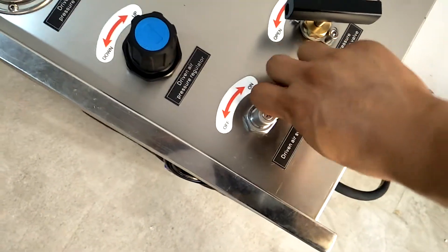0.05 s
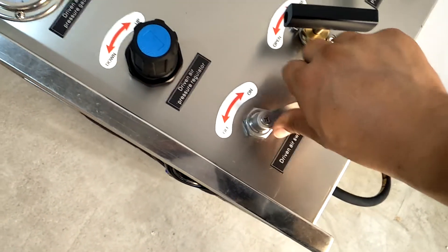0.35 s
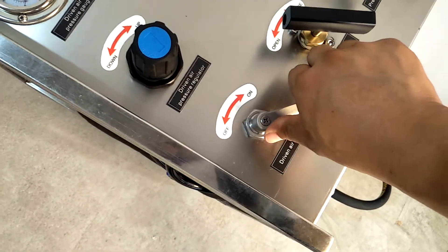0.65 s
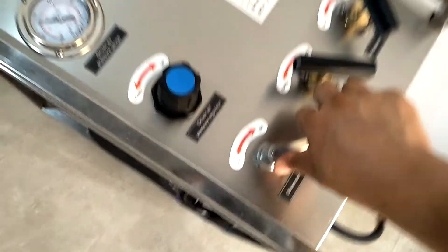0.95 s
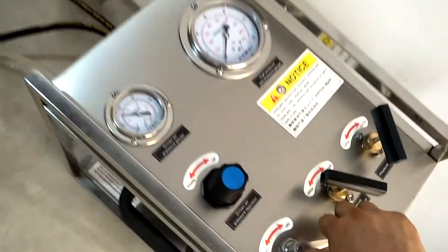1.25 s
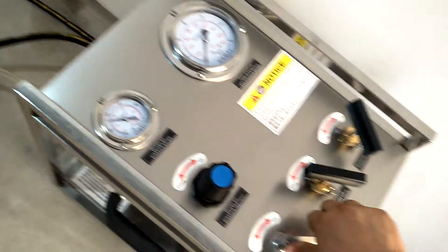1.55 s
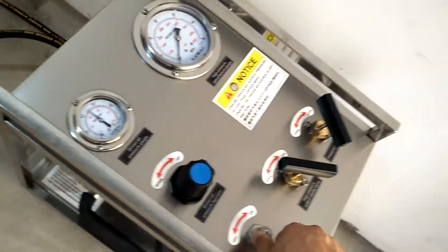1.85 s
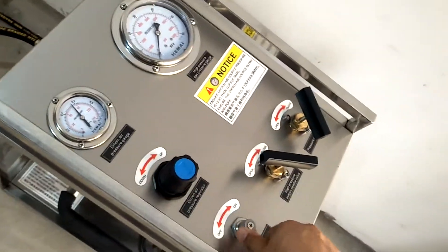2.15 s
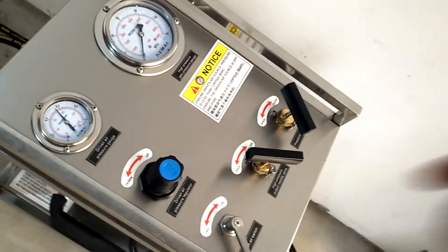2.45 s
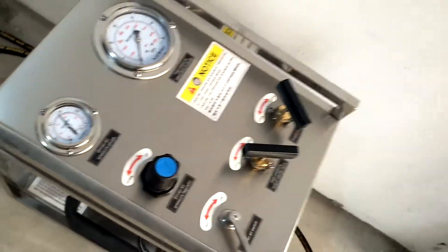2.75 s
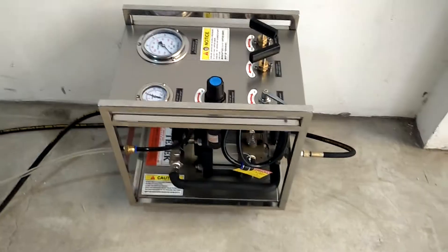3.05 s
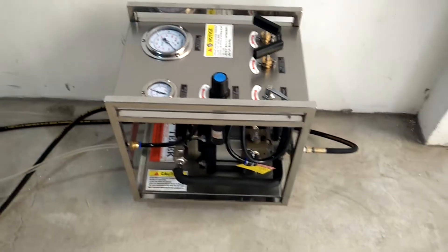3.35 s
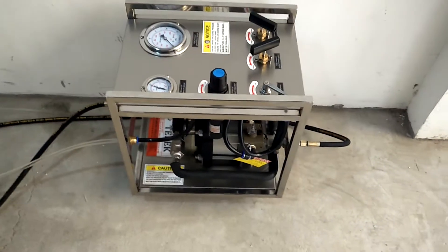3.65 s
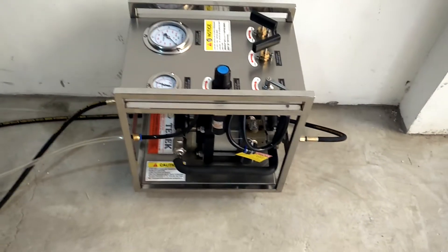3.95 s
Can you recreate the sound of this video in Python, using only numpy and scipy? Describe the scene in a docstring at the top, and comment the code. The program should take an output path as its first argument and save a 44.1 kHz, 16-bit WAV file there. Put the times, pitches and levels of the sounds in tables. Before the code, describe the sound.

An air-driven pump hisses loudly while its piston thuds and clacks evenly, ringing a steel frame. The strokes give way to a fast hammering drone with leaking air, which cuts off abruptly, leaving faint rustles in a quiet workshop.

```python
"""Air-driven booster pump

Exhaust air hisses as turbulent noise while a piston thuds to and fro, each impact exciting the modes
of a steel frame. After two seconds the strokes give way to a fast hammering drone, the harmonic series
of a periodic knock, with churning and leaking air. The sound cuts off abruptly, leaving faint rustles
and ticks in the quiet workshop."""
import sys
import numpy as np
from scipy import signal
from scipy.fft import rfft, irfft
from scipy.io import wavfile

SR = 44100
rng = np.random.default_rng(int(sys.argv[2]) if len(sys.argv) > 2 else 0)


def master_out(mix):
    """Clip the mix to full scale and print it as 16-bit PCM to the path in sys.argv[1]."""
    frames = np.transpose(np.atleast_2d(mix))
    ceiling = np.clip(frames, -1, 1)
    pcm = np.round(ceiling * 32767).astype(np.int16)
    wavfile.write(sys.argv[1], SR, pcm)


N = 176400
T = np.arange(N) / SR
FREQS = np.maximum(np.arange(N // 2 + 1) * SR / N, 1)
PUMP_PAN_DB, RUSTLE_PAN_DB = 2.5, -2
DRONE_HZ = 46.2


def from_db(db):
    """Amplitude ratio: a factor of ten for every 20 dB."""
    return 10 ** (np.asarray(db) / 20)


def unit_rms(x):
    """Normalisation to unit mean power."""
    return x / np.sqrt(np.mean(x ** 2) + 1e-20)


def envelope(rows):
    """Amplitude envelope, linear in decibels between (time_s, level_db) points."""
    return from_db(np.interp(T, *np.transpose(rows)))


def spectrum(points):
    """Spectral curve, interpolated on a logarithmic frequency axis."""
    hz, values = np.transpose(points)
    return np.interp(np.log(FREQS), np.log(hz), values)


def pan(db):
    """Interchannel level difference: positive values favour the left."""
    return from_db(np.array([[db], [-db]]) / 2)


def drift(rate_hz):
    """Slow random fluctuation: low-passed noise of unit rms."""
    return unit_rms(irfft(rfft(rng.standard_normal(N)) / (1 + (FREQS / rate_hz) ** 2), N))


def burst(start_s, rise_s, t60_s):
    """Transient envelope: a linear rise, then exponential decay by 60 dB in t60_s."""
    rise = np.clip((T - start_s) / rise_s, 0, 1)
    return rise * from_db(-60 * np.maximum(T - start_s - rise_s, 0) / t60_s)


def pressure_pulse(crest_s, hz, width_cycles):
    """A Gaussian-windowed cosine makes one abrupt pressure swing: dip, crest, dip."""
    cycles = np.clip(hz * (T - crest_s), -.75, .75)
    return np.cos(2 * np.pi * cycles) * np.exp(-(cycles / width_cycles) ** 2)


def treble_shelf(x, rows, split_hz=8000):
    """Time-varying shelf filter: the treble follows its own envelope."""
    treble = irfft(rfft(x) / (1 + (split_hz / FREQS) ** 12), N)
    return x + treble * (envelope(rows) - 1)


# Likeness of the sound field at left and right: frequency_hz, coherence
COHERENCE = [(60, .98), (150, 0.95), (380, 0.97), (950, 0.3), (2380, 0), (15000, 0.0042)]

def noise(colour, echo_db=-5.5):
    """Partly coherent stereo noise of unit rms, comb-filtered by close reflections off the panels."""
    mid, side = rfft(rng.standard_normal((2, N)))
    coherence = np.clip(spectrum(COHERENCE), -1, 1)
    echoes = np.zeros((2, N))
    for channel in echoes:
        signs = rng.choice([-1, 1], size=6)
        delays = rng.integers(SR // 1000, SR // 100, size=6)
        channel[delays] = from_db(echo_db) * signs
    direct = np.sqrt(1 + coherence) * mid + np.sqrt(1 - coherence) * side * [[1], [-1]]
    comb = 1 + (1 - coherence) * rfft(echoes)
    return unit_rms(irfft(direct * comb * from_db(spectrum(colour)), N))


# Exhaust flow, and the extra gain of its treble: time_s, level_db
EXHAUST_FLOW = [(0, -16), (.04, -16.5), (.08, -12.5), (.5, -14), (1.0, -15), (1.3, -16.5), (1.56, -16.5),
                (1.62, -18), (1.69, -23.5), (1.73, -13.5), (1.86, -12), (1.93, -20.5), (2.02, -22.5),
                (2.2, -37), (3.05, -48.5)]
EXHAUST_TREBLE = [(0, -0.5), (1.55, 1.5), (1.63, -6.5), (1.69, 1), (1.73, -3), (1.9, 1), (2.05, 0.5)]
# Spectra of the hiss and the rumble: frequency_hz, level_db
HISS_SPECTRUM = [(120, -46.5), (200, -17.5), (390, -13), (540, -29.5), (820, -2.5), (1280, -12),
                 (2060, -10), (2330, -3), (2750, -8.5), (3700, -5.5), (4150, -10), (5000, -1.5),
                 (6000, 2.5), (7250, -0.5), (8300, -8.5), (11400, -10.5), (12300, -4.5), (12800, -6),
                 (13150, -11.5), (14400, -4.5), (15600, -14)]
RUMBLE_SPECTRUM = [(25, -20), (50, -20.5), (85, 4), (130, -8), (220, -21), (500, -39.5)]

def exhaust():
    """Turbulence: drive air leaves the muffler as a broadband hiss over a low rumble."""
    flow = envelope(EXHAUST_FLOW) * from_db(.5 * drift(rate_hz=36))
    hiss = pan(2) * treble_shelf(noise(HISS_SPECTRUM), EXHAUST_TREBLE)
    rumble = from_db(-14.5) * noise(RUMBLE_SPECTRUM)
    return flow * (hiss + rumble)


# Modes of the steel frame: pitch_hz, level_db, t60_s
FRAME_MODES = [(67.3, -0.5, 0.9), (82.9, -0.5, 0.75), (103, -3.5, 0.22), (139, 3, 0.41),
               (153.8, -0.5, 0.25), (201, -0.5, 0.25), (234, -5, 0.43), (335, -3, 0.32), (394, 4.5, 0.31),
               (438.5, -2.5, 0.3), (790, -0.5, 0.098), (824, -1, .2), (1520, -2, 0.2)]

def frame_ring():
    """Modal resonance: each stroke excites every damped mode with a slightly different strength."""
    blows = [(0.0014, -4.5)]   # the frame is already ringing at the start
    blows += [(s + .005, db) for s, db in POWER_STROKES]
    blows += [(s, db - 8) for s, db in RETURN_STROKES]
    start_s, blow_db = np.transpose(blows)
    ring = np.zeros((2, N))
    for hz, mode_db, t60_s in FRAME_MODES:
        spread_db = rng.normal(0, 1.2, len(blows)) + rng.normal(0, 1, (2, 1))
        impulses = np.zeros((2, N))
        impulses[:, (start_s * SR).astype(int)] = from_db(blow_db + mode_db + spread_db)
        radius, angle = from_db(-60 / (t60_s * SR)), 2 * np.pi * hz / SR
        feedback = [1, -2 * radius * np.cos(angle), radius ** 2]
        ring += signal.lfilter([0, np.sin(angle)], feedback, impulses + 1e-18)
    return from_db(-25.5) * ring


# Return strokes of the piston: time_s, level_db
RETURN_STROKES = [(.106, -0.5), (0.459, -0.5), (.819, 1), (1.182, -2), (1.548, -1.5)]
# Spectrum of the air valve's clack: frequency_hz, level_db
CLACK_SPECTRUM = [(200, -5.5), (400, -5.5), (570, -14), (850, 6), (1150, -5.5), (1600, -4), (2600, -4.5),
                  (5000, -13), (15000, -29)]

def return_strokes(rebound_s=0.038, valve_delay_s=.024):
    """Impact and rebound: a soft double knock, with the clack of the air valve."""
    knocks = sum(from_db(db - 15.5) * pressure_pulse(s + delay_s, hz=67, width_cycles=.45)
                 for s, db in RETURN_STROKES for delay_s in (0, rebound_s))
    clacks = sum(from_db(db - 16.5) * burst(s + valve_delay_s, rise_s=0.0032, t60_s=0.18)
                 for s, db in RETURN_STROKES)
    return clacks * noise(CLACK_SPECTRUM) - knocks


# Power strokes of the piston: time_s, level_db
POWER_STROKES = [(0.2993, 0.5), (.660, 0), (1.024, 0), (1.391, -0.5), (1.756, 0)]
# Spectra of the spit of air, the hard contact and the rattle: frequency_hz, level_db
SPIT_SPECTRUM = [(2000, -31), (4500, 1), (8000, -2.5), (11000, 1.5), (16000, 0.5)]
CRACK_SPECTRUM = [(200, -21), (400, 0), (600, -8), (840, 4.5), (1050, -5.5), (1400, -34.5), (4000, -48)]
RATTLE_SPECTRUM = [(60, -1), (200, -15), (400, 2), (600, -12.5), (850, -3), (1200, -11), (1500, -7.5),
                   (3000, -11), (5000, -4), (9000, -33)]

def power_strokes():
    """Impact noise: air spits, then hard contact radiates a thud and a crack, and a rattle decays."""
    def bursts(lead_s, rise_s, t60_s):
        return sum(from_db(db) * burst(s - lead_s, rise_s, t60_s) for s, db in POWER_STROKES)
    thuds = sum(from_db(db - 8.5) * pressure_pulse(s, hz=146, width_cycles=1) for s, db in POWER_STROKES)
    spit = from_db(-11) * bursts(lead_s=0.017, rise_s=0.0018, t60_s=0.32) * noise(SPIT_SPECTRUM)
    crack = from_db(-18.5) * bursts(lead_s=0.0057, rise_s=0.00067, t60_s=0.11) * noise(CRACK_SPECTRUM)
    rattle = from_db(-18) * bursts(lead_s=0, rise_s=.01, t60_s=0.4) * noise(RATTLE_SPECTRUM)
    return thuds + spit + crack + rattle


def puffing(depth=0.13):
    """Amplitude modulation: the air pulses at the drone's fundamental."""
    return 1 + depth * np.cos(2 * np.pi * DRONE_HZ * T)


# Flow of the churning air: time_s, level_db
CHURN_FLOW = [(1.75, -31.5), (1.95, -27.5), (2.0, -32), (2.06, -20.5), (2.2, -24.5), (3.05, -25)]
# Its spectrum: frequency_hz, level_db
CHURN_SPECTRUM = [(30, -10.5), (100, -7.5), (280, -9.5), (450, 4), (700, 3), (1000, -8), (1350, -0.5),
                  (1650, -8), (2050, -2.5), (2450, -1), (2800, -10), (4000, -13.5), (9000, -42)]

def churn():
    """Pulsating turbulence: midrange air noise, faint at first, swells under the drone."""
    return puffing() * envelope(CHURN_FLOW) * noise(CHURN_SPECTRUM)


# Knocks within one cycle of the drone: cycle_fraction, relative_strength
CYCLE_KNOCKS = [(.23, 1), (.535, .88)]
# Harmonic series of the drone: harmonic_number, level_db
DRONE_HARMONICS = [(1, -21), (2, -7), (3, -20), (4, 0), (5, -19), (6, -26.5), (7, -3.5), (8, -12),
                   (9, -16.5), (10, -9), (11, -4), (12, -7.5), (13, -6.5), (14, -0.5), (15, -19), (16, -6),
                   (17, -9), (18, -11), (19, -13.5), (20, -20), (21, -16), (22, -18), (23, -23),
                   (24, -15.5), (25, -13.5), (26, -14), (27, -2), (28, -13), (29, -10), (30, -13.5),
                   (31, -25), (32, -8), (33, -17.5), (34, -21.5), (35, -20), (36, -28.5), (37, -18),
                   (38, -22), (39, -11.5), (40, -23), (41, -8), (42, -18), (43, -12), (44, -7), (45, -17),
                   (46, -18)]
# Envelope of the drone, and the extra gain of its upper harmonics: time_s, level_db
DRONE_LEVEL = [(1.9, -61.5), (2.0, -22.5), (2.06, -18), (2.15, -15.5), (2.28, -14.5), (2.7, -14.5),
               (3.05, -15)]
DRONE_TREBLE = [(2.05, -1.8), (2.3, -1.6), (2.65, 0), (3.05, 0.63)]

def drone(catch_s=2.03, settle_s=0.057, smear_hz=1260, wide_hz=518, treble_hz=1600):
    """Fourier series: two knocks a cycle set the phases, which the frame scatters in the treble."""
    jitter_s = .00003 + 0.00078 * np.exp(-np.maximum(T - catch_s, 0) / settle_s)   # the rhythm steadies
    cycles = DRONE_HZ * (T + jitter_s * drift(rate_hz=29))
    fraction, strength = np.transpose(CYCLE_KNOCKS)
    treble = envelope(DRONE_TREBLE)
    delay_s_per_hz = 4.5e-6   # dispersion: each knock's treble arrives later
    hammering = np.zeros((2, N))
    for harmonic, db in DRONE_HARMONICS:
        hz = harmonic * DRONE_HZ
        knock_phase = np.angle(-np.sum(strength * np.exp(-2j * np.pi * harmonic * fraction)))
        scatter = rng.standard_normal() * (.12 + (hz / smear_hz) ** 2)
        phase = knock_phase - np.pi * delay_s_per_hz * hz ** 2 + scatter
        partial = np.exp(1j * (2 * np.pi * harmonic * cycles + phase))
        width = 1.27 * hz ** 2 / (hz ** 2 + wide_hz ** 2)   # left and right differ above wide_hz
        side_angle = rng.choice([-1, 1]) * np.pi / 2 + rng.normal(0, 0.74)
        side = width * np.exp(1j * side_angle) * np.array([[1], [-1]])
        gain = from_db(db) * (treble if hz > treble_hz else 1)
        hammering += gain * np.real((1 + side) * partial)
    return pan(PUMP_PAN_DB) * envelope(DRONE_LEVEL) * unit_rms(hammering)


# Flow of the leak, and the extra gain of its treble: time_s, level_db
LEAK_FLOW = [(1.99, -40.5), (2.012, -23), (2.24, -21.5), (2.39, -16), (2.46, -19.5), (2.56, -19.5),
             (2.61, -24), (2.68, -24), (2.71, -18.5), (2.77, -21), (2.83, -17.5), (2.92, -20), (3.0, -25.5),
             (3.05, -24)]
LEAK_TREBLE = [(2.0, 1.5), (2.4, -10.5), (2.55, -2), (2.608, 7), (2.67, 0.5), (2.71, 11), (2.9, 8),
               (3.05, 6)]
# Its spectrum: frequency_hz, level_db
LEAK_SPECTRUM = [(2000, -18), (2900, -14.5), (3700, -5.5), (4450, 1), (4950, -6.5), (5400, 0), (6300, 2),
                 (7200, -10), (8500, -15.5), (10500, -32), (15000, -40.5)]

def leak():
    """Jet noise: leaking air hisses brightly, puffing in time with the drone."""
    hiss = treble_shelf(noise(LEAK_SPECTRUM), LEAK_TREBLE)
    return pan(3) * puffing() * envelope(LEAK_FLOW) * hiss


# Spectrum of the squeal: frequency_hz, level_db
SQUEAL_SPECTRUM = [(1000, -45), (1260, -14.5), (1345, 2), (1430, -15), (1800, -41)]

def squeal():
    """Narrowband noise is heard as a pitch: air squeals briefly as the drone catches."""
    return from_db(-23.5) * burst(2.025, rise_s=.03, t60_s=.45) * noise(SQUEAL_SPECTRUM)


# Faint rubs: start_s, rise_s, t60_s, level_db, relative_ring_db
RUBS = [(3.365, 0.021, .17, -67, 3), (3.58, .035, 0.43, -59.5, -18), (3.738, .006, 0.3, -61.5, -2.5),
        (3.795, 0.027, 1, -53.5, -11)]
# Spectra of the rubbing and the ringing port: frequency_hz, level_db
RUB_SPECTRUM = [(1000, -15), (2500, 2), (4000, -8), (6300, -1.5), (8700, -6.5), (12000, -14), (14000, -6),
                (16000, -17.5)]
PORT_SPECTRUM = [(3500, -26), (4600, -12), (5150, 6), (5700, -11), (7500, -37)]

def rustles():
    """Friction noise: rubbing beside the right microphone excites the resonance of its port."""
    rub = pan(RUSTLE_PAN_DB) * noise(RUB_SPECTRUM)
    ring = pan(-23.5) * noise(PORT_SPECTRUM)
    rubbing = sum(from_db(db) * burst(start_s, rise_s, t60_s) * (rub + from_db(ring_db) * ring)
                  for start_s, rise_s, t60_s, db, ring_db in RUBS)
    return rubbing * from_db(1.3 * drift(rate_hz=94))


# Faint ticks: start_s, level_db
TICK_EVENTS = [(3.797, -46), (3.809, -43), (3.8643, -43)]
# Their spectrum: frequency_hz, level_db
TICK_SPECTRUM = [(300, -10), (1200, -4), (3500, 0), (5200, -3), (7000, -10), (8800, -0.5), (15000, -20)]

def ticks():
    """Broadband transients: noise that decays within milliseconds is heard as a tick."""
    bursts = sum(from_db(db) * burst(s, rise_s=0.00065, t60_s=0.015) for s, db in TICK_EVENTS)
    return pan(RUSTLE_PAN_DB) * bursts * noise(TICK_SPECTRUM)


# Spectrum of the quiet workshop: frequency_hz, level_db
ROOM_SPECTRUM = [(15, -29), (25, 4), (108, -18), (354, -12), (503, -22.5), (1260, -28), (6050, -30),
                 (9840, -34), (13200, -30.5), (16000, -35.5)]

def room_tone():
    """Ambient noise floor: steady and low, masked while the pump is heard."""
    return from_db(-66) * noise(ROOM_SPECTRUM)


def scene(cut_s=3.047):
    """Superposition: the pump's sounds add, then cut off at an edit, leaving the quiet workshop."""
    piston = pan(PUMP_PAN_DB) * (power_strokes() + return_strokes() - frame_ring())
    pump = piston + exhaust() + drone() + leak() + squeal() + churn()
    tail = from_db(-21.5) * burst(cut_s, rise_s=1 / SR, t60_s=0.049)
    gate = np.where(T < cut_s, 1, tail)
    return gate * pump + rustles() + ticks() + room_tone()


def record(dry, low_cut_hz=24, high_cut_hz=15700):
    """Band limiting: the microphone drops the deepest bass, peaks clip, and the top is cut steeply."""
    high_pass = signal.butter(1, low_cut_hz, "high", fs=SR, output="sos")
    low_pass = signal.ellip(12, .1, 80, high_cut_hz, fs=SR, output="sos")
    clipped = np.clip(signal.sosfilt(high_pass, dry), -1, 1)
    return signal.sosfilt(low_pass, clipped)


dry = scene()
out = record(dry)
master_out(out)
```